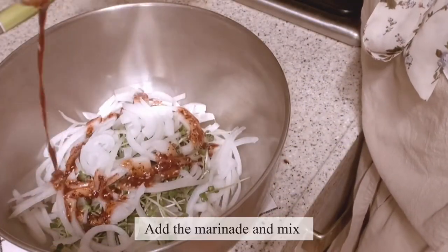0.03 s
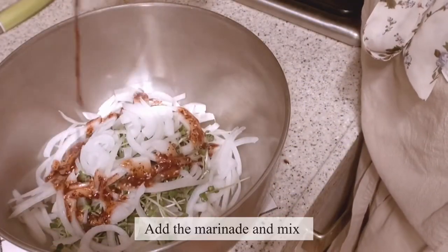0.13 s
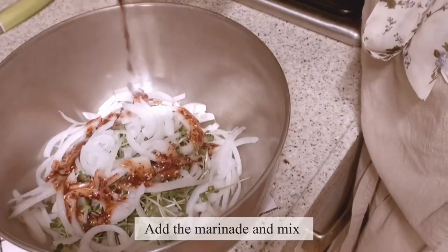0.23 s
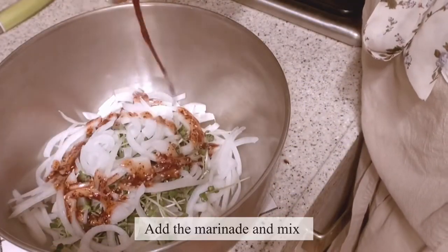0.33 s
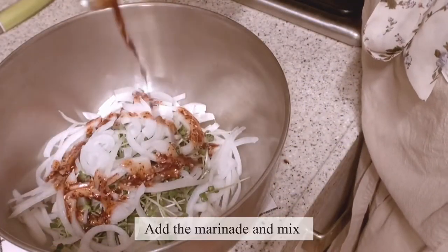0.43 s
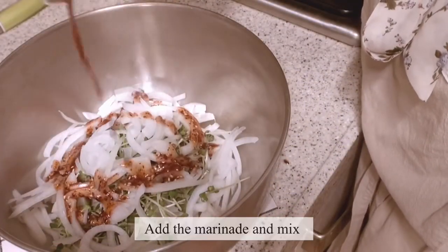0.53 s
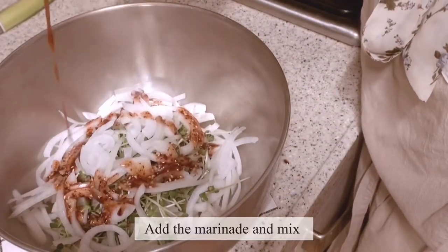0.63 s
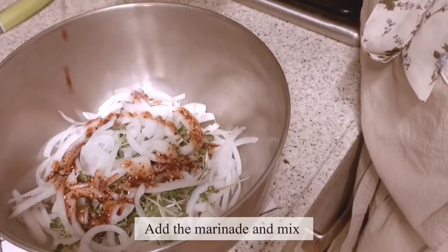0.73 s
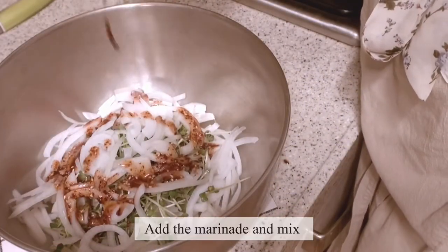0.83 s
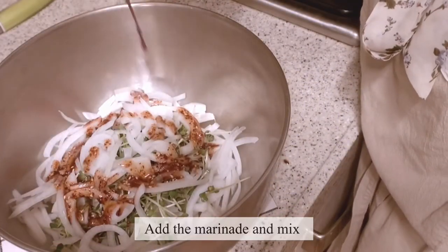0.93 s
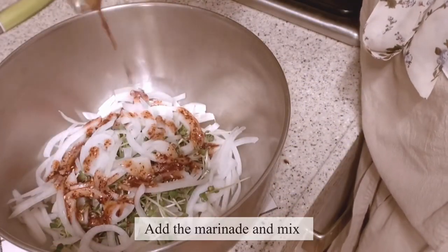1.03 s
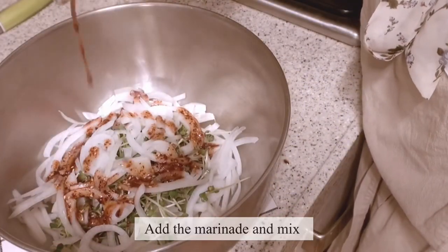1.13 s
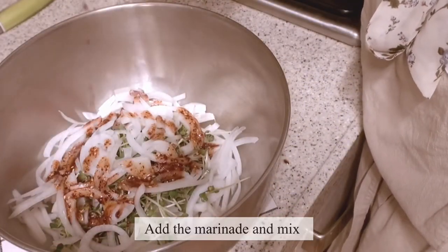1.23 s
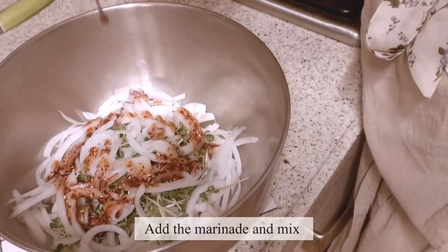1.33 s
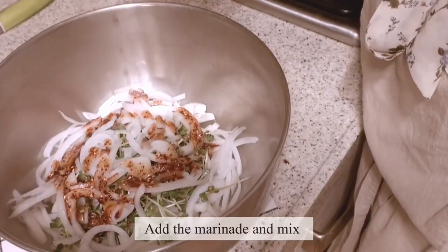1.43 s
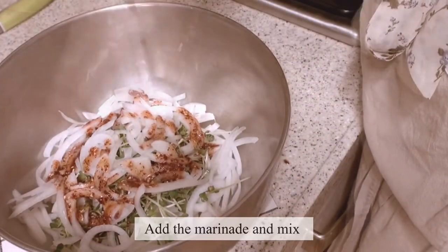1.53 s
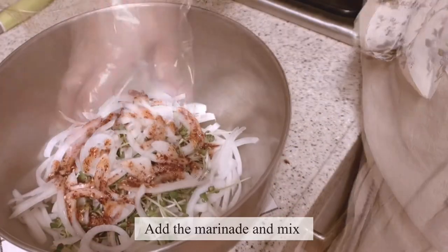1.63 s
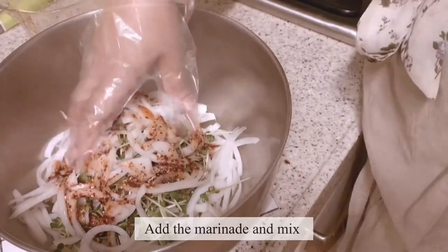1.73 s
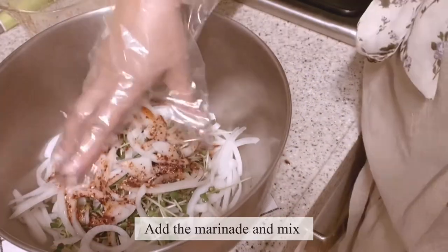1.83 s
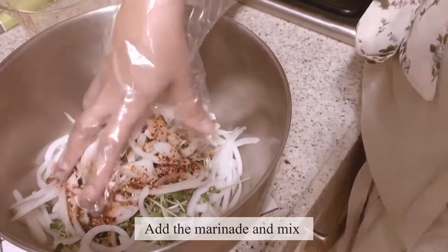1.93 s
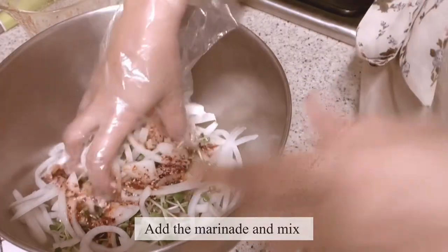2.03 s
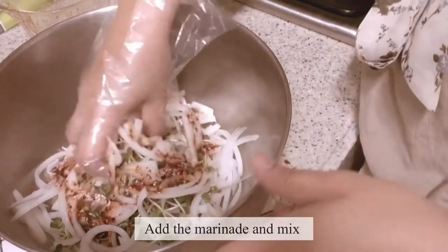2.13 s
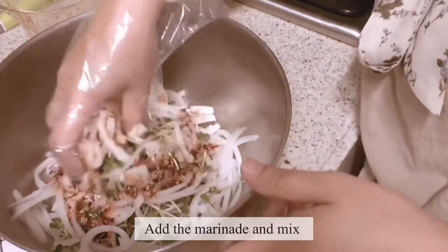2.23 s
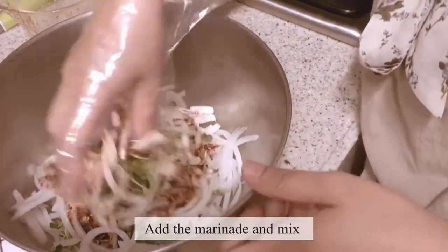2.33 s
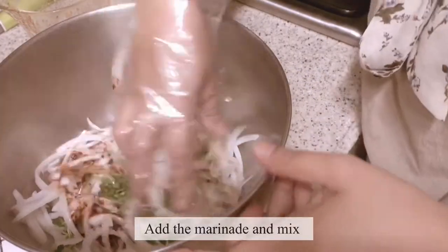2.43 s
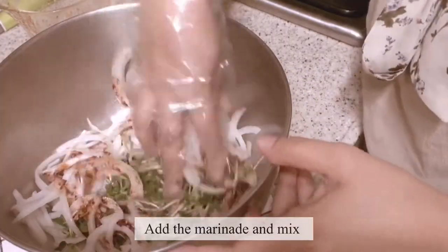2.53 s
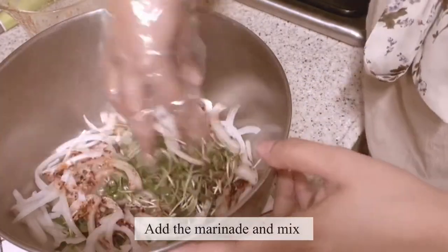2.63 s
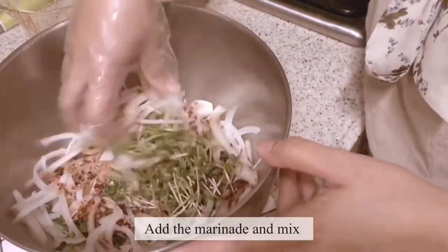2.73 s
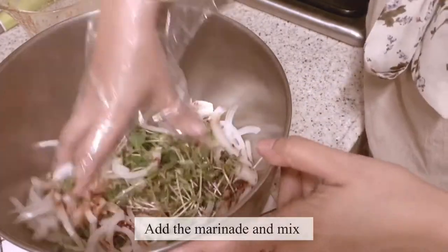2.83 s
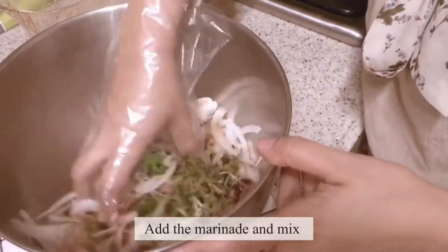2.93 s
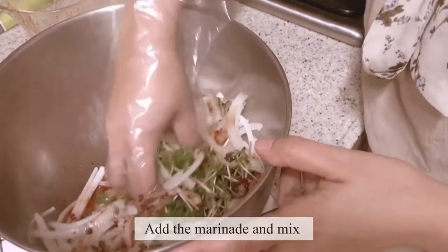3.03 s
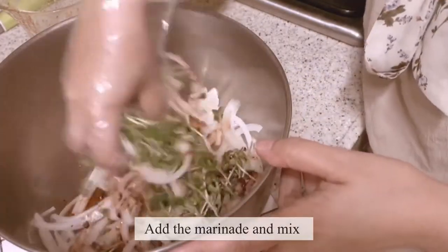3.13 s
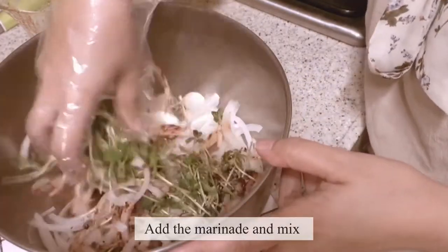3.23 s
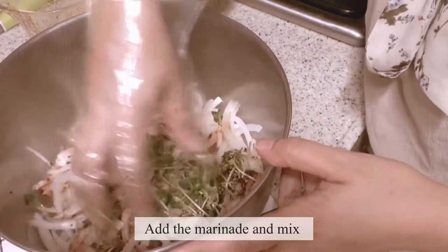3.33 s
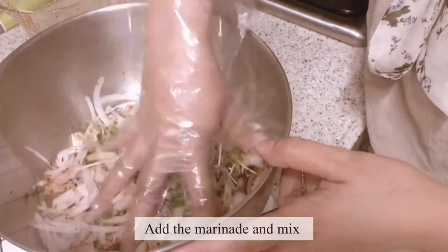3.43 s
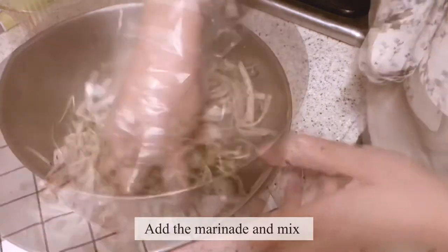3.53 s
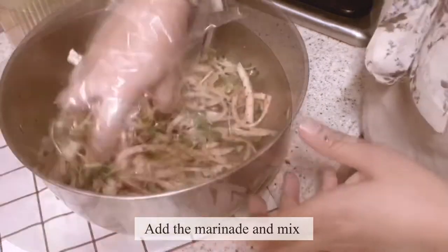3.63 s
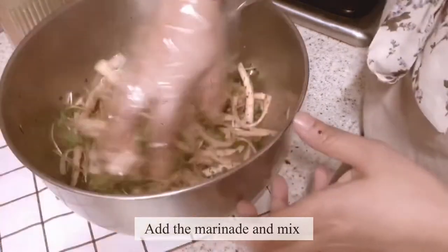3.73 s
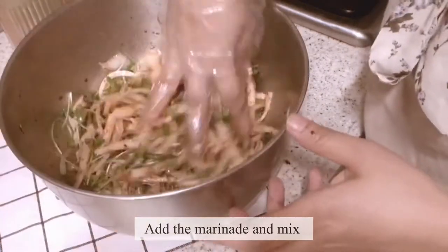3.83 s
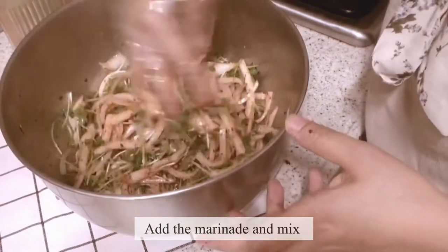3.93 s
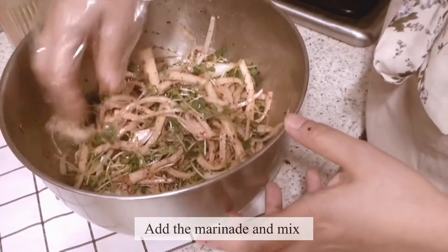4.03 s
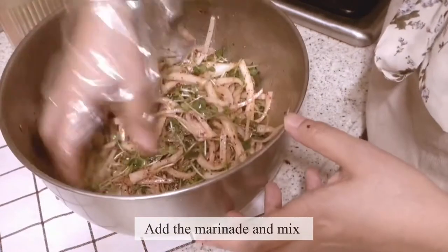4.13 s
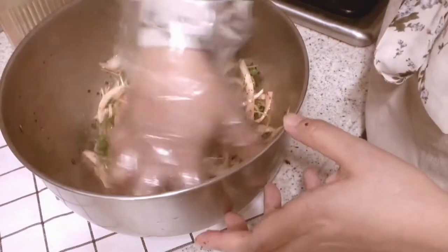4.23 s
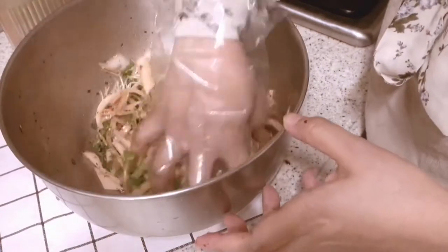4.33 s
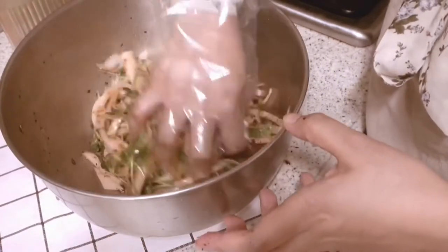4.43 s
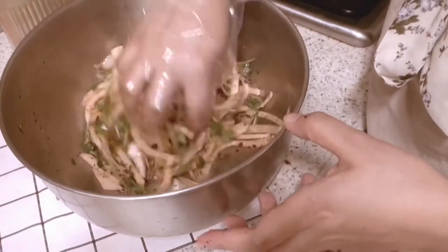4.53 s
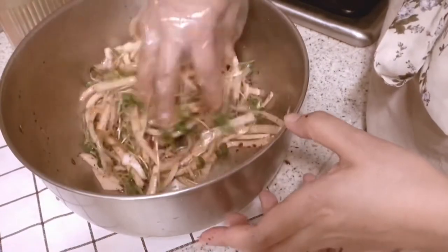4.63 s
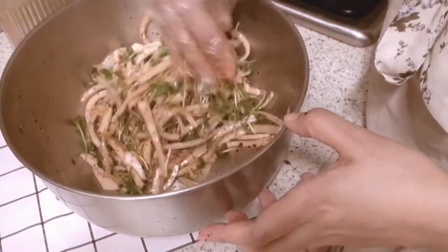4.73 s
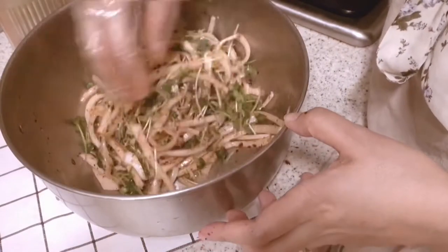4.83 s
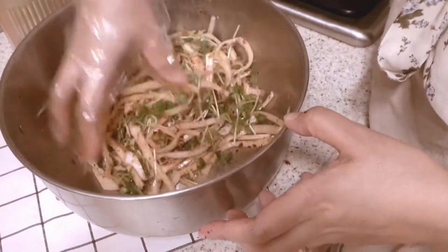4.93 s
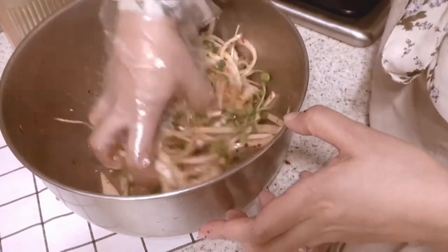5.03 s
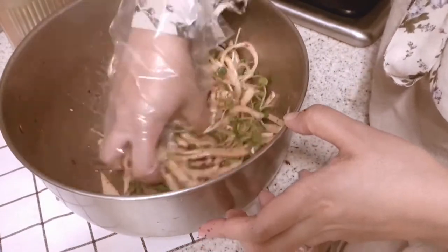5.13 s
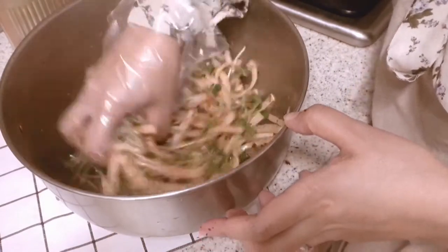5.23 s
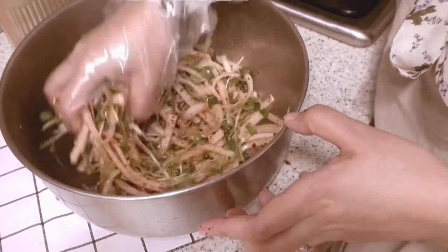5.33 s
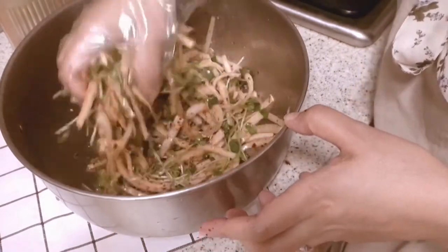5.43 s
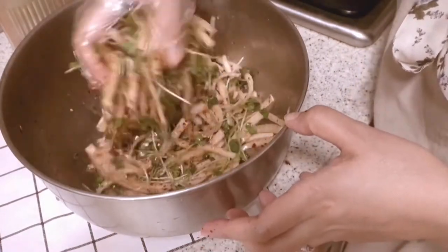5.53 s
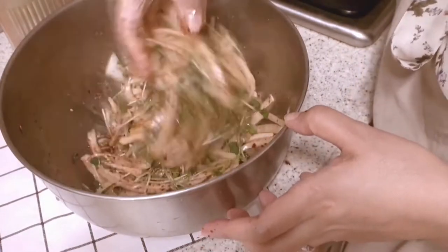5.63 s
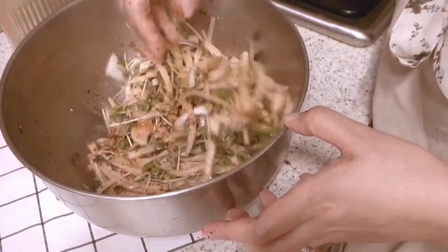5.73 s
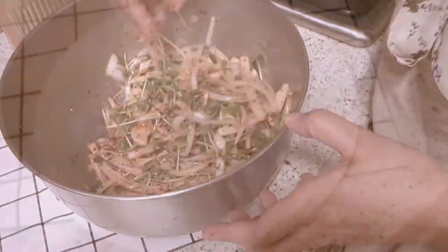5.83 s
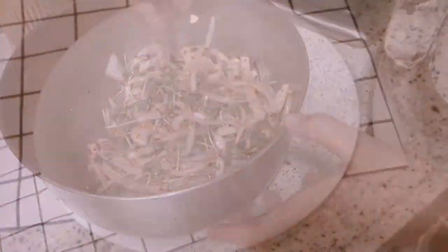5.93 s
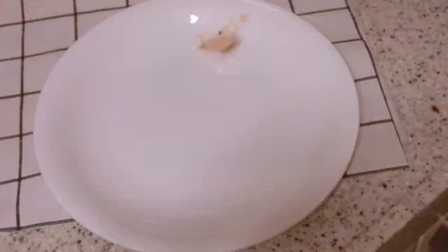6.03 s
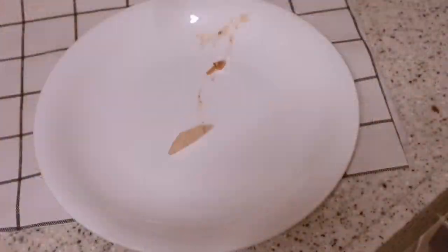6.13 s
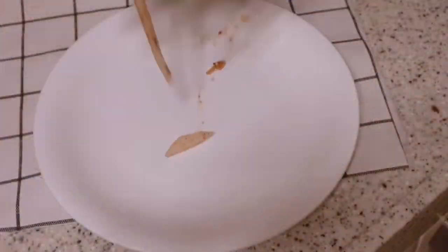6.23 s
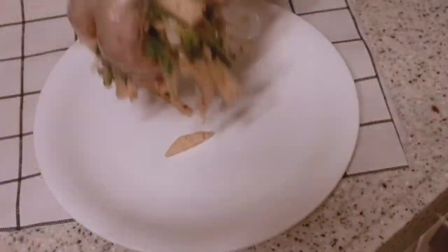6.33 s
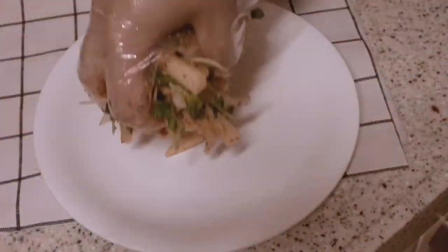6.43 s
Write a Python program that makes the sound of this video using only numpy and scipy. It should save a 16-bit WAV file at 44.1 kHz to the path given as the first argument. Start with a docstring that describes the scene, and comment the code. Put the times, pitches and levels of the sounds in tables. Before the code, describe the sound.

A small, still kitchen with soft air noise and a faint appliance hum, heard close up, slightly left, with very short reflections. From 0 to 1 second, tiny wet drips of marinade tick quietly and irregularly, followed by a short pause. At about 1.4 seconds a hand in a thin plastic glove enters the steel bowl and the sound jumps to a dense, juicy crackle of sliced vegetables, swelling and settling with each push. Sharp crisp snaps pop throughout; dull metallic bumps come near 1.7, 2.9, 3.9, 4.1 and 4.9, and a short glove squeak at 2.4. The hum drops away around 3.7. Pushes become shorter and drier, with a strong one at 4.8, then gentler rustling after 5.2 and faint squeaks near 5.7. At 5.9 a china plate gives a hard bright clink, then a softer tap, ringing briefly over two faint wet drops until 6.4.

```python
"""A small kitchen with still air and a faint appliance hum: marinade drips onto sliced onion and sprouts in a steel
bowl, then a hand in a thin plastic glove tosses them. Shaped noise, clicks and bubbles, driven by the hand's effort,
make the wet crackle; bursts of pitched noise make the louder snaps and the drops. Now and then the glove squeaks or
the hand bumps the resonant bowl. Near the end a china plate, a set of decaying sines, is tapped twice."""
import sys
import numpy as np
from scipy import signal
from scipy.fft import rfft, irfft
from scipy.io import wavfile
from scipy.ndimage import uniform_filter1d

SR = 44100
rng = np.random.default_rng(int(sys.argv[2]) if len(sys.argv) > 2 else 0)


def generate_wav(signal):
    """Clip the signal to [-1, 1] and save it as 16-bit WAV at the path in sys.argv[1]."""
    frames = np.transpose(np.atleast_2d(signal))
    scaled = np.clip(frames, -1, 1) * 32767
    pcm = np.round(scaled).astype(np.int16)
    wavfile.write(sys.argv[1], SR, pcm)


N = 285768
TIME = np.arange(N) / SR

# the loudest slices breaking: (time [s], level before the snap gain [dB], pitch [Hz])
SNAPS = [(1.548, -11.5, 3300), (1.6185, -6, 4760), (1.7085, -11.5, 2650), (1.7516, -10, 2700),
         (1.8592, -11, 7400), (1.9089, -16, 3360), (2.0906, -22, 5320), (2.1275, -15, 8240),
         (2.2403, -13, 4870), (2.2622, -8.5, 5800), (2.3214, -7.5, 5230), (2.359, -10, 3930),
         (2.4505, -12.5, 5800), (2.5594, -10.5, 4300), (2.6312, -10, 4650), (2.6724, -6, 4630),
         (2.7606, -7.5, 6295), (2.956, -12.5, 5050), (3.2087, -9.5, 6800), (3.2655, -10, 7660),
         (3.4993, -9, 3980), (3.712, -13.5, 3720), (3.777, -20, 6650), (3.8541, -17, 6100),
         (3.914, -19, 5070), (3.9375, -6.5, 4100), (4.0252, -16.5, 3100), (4.141, -8.5, 6900),
         (4.7193, -10, 5340), (4.782, -6.5, 5200), (4.8059, -10.5, 7060), (4.8965, -12.5, 5550),
         (4.9798, -11, 6360), (5.2054, -30.5, 5060), (5.3634, -17.5, 5640), (5.4133, -16.5, 3950),
         (5.439, -20, 4800), (5.6451, -28, 4140), (5.718, -29.5, 5500)]


def from_db(db):
    """Decibels to gain."""
    return 10 ** (np.asarray(db) / 20)


def rms_one(x):
    """Scale to unit power."""
    return x / np.sqrt(np.mean(x ** 2) + 1e-20)


def level_curve(rows):
    """Interpolate (time, level) rows to a level in dB at every sample."""
    s, db = np.transpose(rows)
    return np.interp(TIME, s, db)


def cut(x, hz, kind, order=4):
    """Butterworth low- or high-pass."""
    return signal.sosfilt(signal.butter(order, min(hz, .45 * SR), kind, fs=SR, output="sos"), x + 1e-18)


def convolve(x, response):
    """Pass a sound through an impulse response, keeping its length."""
    return signal.oaconvolve(x, response)[:len(x)]


def colour(x, spectrum, size=4096):
    """Causal (minimum-phase) filter with the given spectrum, built by folding its cepstrum."""
    hz, db = np.transpose(spectrum)
    grid = np.maximum(np.fft.rfftfreq(size, 1 / SR), 1)
    gain = from_db(np.interp(np.log(grid), np.log(hz), db))
    cepstrum = irfft(np.log(gain))
    cepstrum[1:size // 2] *= 2
    cepstrum[size // 2 + 1:] = 0
    return convolve(x, irfft(np.exp(rfft(cepstrum))))


def resonate(x, hz, width_hz):
    """A two-pole resonance with gain 1 on top; the narrower it is, the longer it rings."""
    r = np.exp(-np.pi * width_hz / SR)
    feed = np.array([1, 0, -1]) * (1 - r * r) / 2
    feedback = [1, -2 * r * np.cos(2 * np.pi * hz / SR), r * r]
    return signal.lfilter(feed, feedback, x + 1e-18)


def drift(rate):
    """A random wander of spread 1 along straight lines, with `rate` random points per second."""
    knots = rng.standard_normal(N // 20)
    return rms_one(np.interp(TIME * rate, np.arange(len(knots)), knots))


def dying_noise(t60, start=0.):
    """Half a second of decaying noise with unit energy, silent until `start` [s]."""
    t = TIME[:SR // 2]
    cloud = rng.standard_normal(len(t)) * from_db(-60 * t / t60) * (t >= start)
    return cloud / np.sqrt(np.sum(cloud ** 2) + 1e-20)


def add(track, s, sound):
    """Mix a sound in at a time."""
    at = max(round(s * SR), 0)
    track[at:at + len(sound)] += sound[:max(N - at, 0)]


def clicks(per_s, spread_db):
    """Random clicks of either sign, most small and a few large."""
    when, strength, sign = rng.random((int(per_s * N / SR), 3)).T
    level_db = spread_db * np.minimum(-np.log(1 - strength), 4.5)
    out = np.zeros(N)
    out[(when * N).astype(int)] = from_db(level_db) * np.sign(sign - .5)
    return out


def echoes(x, t60, start=0., count=6):
    """Diffuse reflections: in each band fresh noise follows the sound's energy, which lingers and dies."""
    edges = np.geomspace(150, 12000, count + 1)
    bands = [(edges[0], "low"), *[(pair, "band") for pair in zip(edges, edges[1:])], (edges[-1], "high")]
    keep = from_db(-120 / (t60 * SR))  # per sample; doubled because it acts on energy
    lag = int(abs(start) * SR)
    white, out = rng.standard_normal((2, N)), np.zeros(N)
    for k, (hz, kind) in enumerate(bands):
        sos = signal.butter(2, hz, kind, fs=SR, output="sos")
        power = signal.sosfilt(sos, x + 1e-18) ** 2 + 1e-20
        energy = signal.lfilter([1 - keep], [1, -keep], power)
        band_noise = rms_one(signal.sosfilt(sos, white[k % 2]))
        out[lag:] += (np.sqrt(energy) * band_noise)[:N - lag]
    return out


def background(air_db=-54.5, waver_db=0.5):
    """Still kitchen air is stereo shaped noise; an appliance hum is a few sines that waver in level."""
    # kitchen air: (frequency [Hz], relative level per Hz [dB])
    air_spectrum = [(25, -33), (59, -6), (86, -24), (130, -10.5), (200, -4.5), (310, -4.5), (450, -5.5),
                    (900, -6.5), (2000, -9.5), (5000, -17.5), (8200, -18), (9200, -23), (12000, -23.5),
                    (14600, -27), (15500, -43)]
    # stereo width of the air: (frequency [Hz], side against mid [dB])
    air_width = [(20, -39), (60, -30), (200, -27), (500, -6.5), (1100, -3.5), (3000, -4), (7000, -7),
                 (9500, -13), (11500, -26), (15000, -26)]
    # hum over time: (time [s], level [dB])
    hum_level = [(0, -69.5), (3.58, -64.5), (3.76, -89.5), (6.48, -85)]
    # hum lines: (frequency [Hz], level against the hum [dB])
    hum_lines = [(120, -0.42), (326, 0.48), (875, 0.82)]
    mid, side = [from_db(air_db) * rms_one(colour(white, air_spectrum))
                 for white in rng.standard_normal((2, N))]
    hum = np.zeros(N)
    for hz, db in hum_lines:
        hum += np.sqrt(2) * from_db(db + waver_db * drift(rate=3.1)) * np.sin(2 * np.pi * hz * TIME)
    return mid + from_db(level_curve(hum_level)) * hum + colour(side, air_width) * [[1], [-1]]


def stereo(x, lean, spread_db):
    """The sound leans to the left, and echoes from the sides differ between the channels."""
    # stereo width of the close sounds: (frequency [Hz], side gain [dB])
    near_width = [(20, -32), (70, -25), (250, -46), (450, -27), (750, -11.5), (1700, -8.5), (3200, -9),
                  (5000, -16.5), (7400, -13), (7800, -4.5), (9500, -7.5), (11000, -13.5), (11800, -37),
                  (15000, -35)]
    side = colour(lean * x + from_db(spread_db) * echoes(x, t60=0.0055), near_width)
    return np.array([x + side, x - side])


def plate(tick_db=-4.0, clatter_db=23.5, clatter_t60=0.031, clatter_hz=2600):
    """A hard tick and a short clatter, then the china rings; a softer touch wakes only the low modes."""
    # taps: (time [s], level [dB], ringing against the tap [dB], pitch above which the contact fades [Hz])
    taps = [(5.9042, -22.5, -1.5, 14000), (5.9725, -27.5, -5, 1940)]
    # china modes: (frequency [Hz], level [dB], t60 [s])
    china_modes = [(786, -21, .33), (1712, -21.5, 1.15), (2455, -14.5, 0.15), (2805, -18.5, 0.47),
                   (4021, -20, 0.25), (5712, -26, .13), (6940, -23, .15), (9080, -23, .18),
                   (11750, -10.5, .14)]
    out, t = np.zeros(N), TIME[:SR]
    for s, tap_db, ring_db, top_hz in taps:
        clatter = cut(dying_noise(clatter_t60), clatter_hz, "low", order=2)
        contact = from_db(clatter_db) * cut(clatter, 540, "high", order=2)
        contact[0] += from_db(tick_db)
        add(out, s, from_db(tap_db) * cut(contact, 2 * top_hz, "low", order=2))
        ringing = np.zeros(len(t))
        for hz, db, t60 in china_modes:
            mode = from_db(db - 60 * t / t60) * np.sin(2 * np.pi * hz * (t + s))  # both taps ring in step
            ringing += mode / (1 + (hz / top_hz) ** 4)
        add(out, s, from_db(tap_db + ring_db) * ringing)
    return out


def bowl(x, damping_db=2.5):
    """The steel's resonances ring along, each more or less freely as the salad shifts over it."""
    # resonances of the filled bowl: (frequency [Hz], width [Hz], mean level [dB])
    steel_modes = [(302.3, 8.8, -0.5), (543.3, 23.5, 5), (680, 25, -3), (1015, 62, 7.5), (1527, 110, -1.5),
                   (1968, 20, -3), (2720, 60, -5), (3850, 13, -1.5), (5355, 18, -8.5)]
    ringing = np.zeros(N)
    for hz, width_hz, db in steel_modes:
        ringing += from_db(db + damping_db * drift(rate=11)) * resonate(x, hz, width_hz)
    return x + ringing


def bumps(thud_db=-14.0, slap_db=-11.0, slap_t60=0.11, rise_s=0.0039):
    """A soft blow on the bowl gives a damped sine thud with a wet slap of noise round it."""
    # the hand bumps the bowl: (time [s], level before thud and slap gains [dB], thud pitch [Hz], thud t60 [s])
    blows = [(1.686, -17, 518, 0.12), (2.868, -16, 604, 0.045), (3.158, -24, 310, 0.046),
             (3.306, -37, 189, .2), (3.934, -21, 340, 0.1), (3.940, -23.5, 239, .2), (4.141, -17, 560, .1),
             (4.145, -28, 134, 0.34), (4.938, -18, 537, .085)]
    out, t = np.zeros(N), TIME[:SR // 2]
    for s, blow_db, hz, t60 in blows:
        thud = np.sin(2 * np.pi * hz * t) * from_db(thud_db - 60 * t / t60)
        slap = resonate(dying_noise(slap_t60), hz, 0.96 * hz)
        slap = from_db(slap_db) * slap / np.std(slap[:SR // 50])
        blow = (thud + slap) * (1 - np.exp(-t / rise_s))
        add(out, s, from_db(blow_db) * cut(blow, 0.65 * hz, "high", order=3))
    return bowl(out)


def squeaks(ring_t60=0.19, waver=0.021, rasp_db=0.0, rasp_hz=5300, rasp_t60=0.11):
    """Wet plastic sticks and slips on the steel: a short rasp, and an unsteady note that sings on briefly."""
    # squeaks of the glove: (time of full strength [s], level [dB], build-up [s], mean pitch [Hz])
    glove_squeaks = [(2.361, -20, .005, 3920), (2.372, -27, 0.0074, 4320), (5.649, -37, 0.0071, 4220),
                     (5.663, -42, .01, 4030), (5.86, -42.5, .015, 4360), (5.871, -45, 0.0082, 4080)]
    out, t = np.zeros(N), TIME[:SR // 3]
    for s, squeak_db, build_s, hz in glove_squeaks:
        # 900 random pitches per second, joined by lines
        pitch = hz * (1 + waver * np.interp(t * 900, np.arange(300), rng.standard_normal(300)))
        note = np.sin(2 * np.pi * np.cumsum(pitch) / SR)
        rasp = resonate(rng.standard_normal(len(t)), rasp_hz, 3000)
        rasp = from_db(rasp_db) * rms_one(resonate(rasp, rasp_hz, 3000))
        since = np.maximum(t - build_s, 0)
        sound = note * from_db(-60 * since / ring_t60) + rasp * from_db(-60 * since / rasp_t60)
        add(out, s - build_s, np.minimum(t / build_s, 1) * from_db(squeak_db) * sound)
    return out


def pops(table, gain_db, damping, splinter_db, splinter_t60, crack_db, burst_t60=0.0055, rise_s=.0012):
    """Each pop is a brief pitched tear with a broad crack and a spray of noise trailing after it."""
    # colour of a pop: (frequency [Hz], relative level [dB])
    pop_spectrum = [(200, -38), (800, -5.5), (3000, 4.5), (7000, 3.5), (9500, -4.5), (12000, -2.5),
                    (16000, -41)]
    out = np.zeros(N)
    for s, peak_db, hz in table:
        spray = from_db(splinter_db) * dying_noise(splinter_t60, start=0.00035)
        force = (dying_noise(burst_t60) + spray)[:SR // 8]
        force = force * np.minimum(TIME[:len(force)] / rise_s, 1)
        tear = resonate(force, hz, damping * hz)
        pulse = colour(tear + from_db(crack_db) * force, pop_spectrum)
        add(out, s, pulse / np.abs(pulse).max() * from_db(peak_db + gain_db))
    return out


def bubbles(per_s=420, spread_db=4.0, cycles=30, glide=0.02):
    """Small bubbles in the marinade ring for a moment, each at a pitch of its own that rises a little."""
    out = np.zeros(N)
    for when, pitch, strength, life in rng.random((int(per_s * N / SR), 4)):
        hz = 450 * 19 ** pitch  # 450 to 8550 Hz
        t60 = cycles * (.5 + life) / np.sqrt(1500 * hz)  # high ones last more cycles
        age = TIME[:int(t60 * SR) + 2] / t60
        phase = 2 * np.pi * hz * t60 * age * (1 + glide * age / 2)
        ring = np.sin(phase) * from_db(-60 * age)
        level_db = spread_db * min(-np.log(1 - strength), 4)
        add(out, when * N / SR, ring * np.sqrt(hz / t60) * from_db(level_db))
    return rms_one(out)


def grains(per_s, spread_db, damping, patchy_db, count=24):
    """Tiny wet films burst and ring for a few cycles; bursts of like pitch come in flurries."""
    out = np.zeros(N)
    for hz in np.geomspace(120, 14000, count):
        bursts = rms_one(clicks(per_s / count, spread_db))
        flurry = bursts * from_db(patchy_db * drift(rate=55))
        out += resonate(flurry, hz, damping * hz)
    return rms_one(out)


def effort():
    """The hand's effort and the wetness in dB: each push builds, holds and dies as the slices settle."""
    # between pushes the glove keeps sliding over the slices: (time [s], level [dB])
    sliding = [(1.39, -48.5), (1.45, -34.3), (2.06, -36.5), (3.0, -35), (3.8, -38), (4.7, -39.5),
               (5.2, -45), (5.6, -45), (5.8, -55.4)]
    # pushes: (time [s], build-up [s], hold [s], t60 of the settling slices [s], effort [dB], wetness [dB])
    strokes = [(1.445, 0.09, 0.0072, 0.53, -29, 4), (1.64, 0.019, 0.023, 0.56, -25.5, 5),
               (1.758, 0.16, 0.046, 0.2, -21, 2.8), (2.152, 0.008, 0.018, 1, -34.5, 3),
               (2.228, 0.11, 0.012, 0.46, -23.9, 0.7), (2.502, 0.11, 0.083, 0.26, -21.5, 2.5),
               (2.693, 0.061, 0.12, 0.26, -23.5, 5), (3.155, 0.12, 0.18, 0.43, -25, 4),
               (3.512, 0.095, 0.097, 0.11, -30, -2), (3.915, 0.023, 0.0093, 0.16, -23, -7),
               (3.954, 0.032, 0.19, 0.14, -31, 0), (4.19, 0.018, 0.018, 0.16, -30, -3.3),
               (4.295, 0.01, 0.038, 0.29, -33, -6), (4.44, 0.031, 0.034, 0.42, -35.5, 1),
               (4.54, 0.051, 0.03, 0.24, -28, -6.5), (4.773, 0.008, 0.19, 0.57, -25.5, -0.8),
               (5.306, 0.1, 0.087, 0.47, -36.5, -2.5)]
    power = from_db(level_curve(sliding)) ** 2
    wet_power = power
    for s, build_s, hold_s, t60, level_db, wet_db in strokes:
        settling_s = np.maximum(TIME - s - build_s - hold_s, 0)
        fall_db = 60 * np.minimum(settling_s / t60, 2)
        push = np.clip((TIME - s) / build_s, 0, 1) * from_db(level_db - fall_db)
        power = power + push ** 2
        wet_power = wet_power + (push * from_db(wet_db)) ** 2
    return 10 * np.log10(power), 10 * np.log10(wet_power / power)


def snap_room(duck_db=1.8, lead_s=0.05):
    """The rustle is turned down shortly before each snap, so that the snap stands out."""
    marks = np.zeros(N)
    marks[[int(s * SR) for s, peak_db, hz in SNAPS]] = 1
    # filtered backwards, so the dip deepens towards each snap
    ahead = signal.lfilter([1], [1, -np.exp(-1 / (lead_s * SR))], marks[::-1] + 1e-18)[::-1]
    return from_db(-duck_db * ahead)


def salad_texture(clump_db=2.0, tear_db=-7.5, bubble_db=-5.5, scatter_db=0.5):
    """Bursting films, tearing fibres and bubbles come in clumps and rattle round the steel bowl."""
    # colour of the wet salad: (frequency [Hz], relative level [dB])
    salad_spectrum = [(50, -23.5), (100, -18), (200, -18.5), (400, -8.5), (800, -6.5), (1300, -5.5),
                      (2200, 2), (4000, 0.5), (6800, 4), (8200, -0.5), (10000, -9), (11800, -5.5),
                      (14000, -17.5), (16000, -46)]
    films = grains(per_s=4200, spread_db=3.5, damping=0.21, patchy_db=3.5)
    fibres = rms_one(clicks(per_s=450, spread_db=5.5))
    texture = films + from_db(bubble_db) * bubbles() + from_db(tear_db) * fibres
    texture = texture * from_db(clump_db * drift(rate=170))
    texture = texture + from_db(scatter_db) * echoes(texture, t60=0.13, start=.0004)  # off the steel walls
    return colour(bowl(texture), salad_spectrum)


def tossing(ordinary_push_db=-30, catch_db=0.89):
    """The hand's effort and the wetness drive rubbing, squelch, crunch and crinkle, one pitch band each."""
    # rubbing on the steel, wet squelch, crunch of the slices, crinkle of the glove: (level at an ordinary
    # push [dB], gain per dB of effort [dB/dB], gain per dB of wetness [dB/dB])
    voices = [(-58, 0.42, 1.0), (-39, 0.68, 1.0), (-35, 0.89, .42), (-30.5, 1.0, 0.0)]
    hand_in_s, hand_out_s, touch_s = 1.388, 5.91, 0.03  # enters and leaves the bowl; time to make contact
    rest, bands = salad_texture(), []
    for hz in (300, 1300, 4000):
        bands.append(cut(rest, hz, "low"))
        rest = cut(rest, hz, "high")
    bands.append(rest)
    effort_db, wet_db = effort()
    push_db = effort_db - ordinary_push_db + catch_db * drift(rate=40)  # slices catch and slip
    touching = np.clip(np.minimum(TIME - hand_in_s, hand_out_s - TIME) / touch_s, 0, 1)
    out = np.zeros(N)
    for band, (level_db, per_effort, per_wet) in zip(bands, voices):
        # level out slow swells, so that the hand sets the loudness
        steady = band / np.sqrt(uniform_filter1d(band ** 2, size=1800) + 1e-12)
        out += steady * from_db(level_db + per_effort * push_db + per_wet * wet_db)
    return out * touching


def scene(room_db=-16.0, room_t60=0.051):
    """Bowl and plate close by in a small room, over the kitchen's air and hum."""
    # drops of marinade landing: (time [s], level before the drop gain [dB], pitch [Hz])
    landings = [(0.0542, -35.5, 7460), (0.1341, -43, 4950), (0.215, -36, 6160), (0.384, -35, 8050),
                (0.4459, -44, 6330), (0.4924, -43, 4240), (0.6789, -47, 5900), (0.699, -45, 5350),
                (1.016, -42, 7150), (6.079, -40, 3720), (6.339, -38, 3770)]
    drops = pops(landings, gain_db=-3.0, damping=0.5, splinter_db=-4.5, splinter_t60=0.12, crack_db=-26.0)
    snaps = pops(SNAPS, gain_db=-1.5, damping=0.2, splinter_db=-5.5, splinter_t60=0.07, crack_db=-8.5)
    near = plate() + bumps() + squeaks() + drops + bowl(snaps) + tossing() * snap_room()
    near = near + from_db(room_db) * echoes(near, room_t60, start=.005)
    return background() + stereo(near, lean=0.32, spread_db=-3.5)


def record(dry):
    """A steep elliptic low-pass cuts the top at 15.8 kHz."""
    return signal.sosfilt(signal.ellip(10, .1, 80, 15800, fs=SR, output="sos"), dry)


dry = scene()
out = record(dry)
generate_wav(out)
```